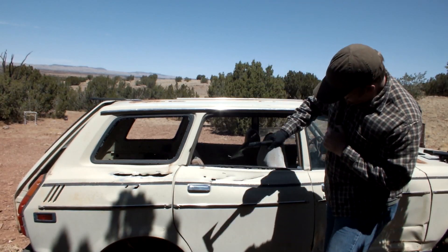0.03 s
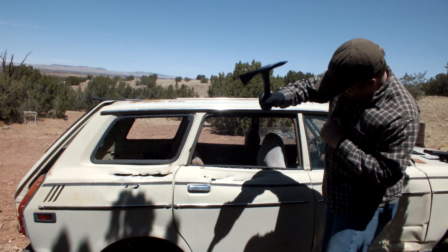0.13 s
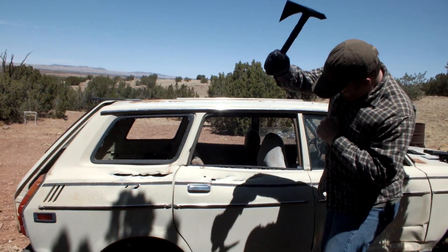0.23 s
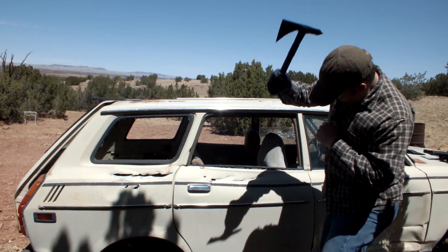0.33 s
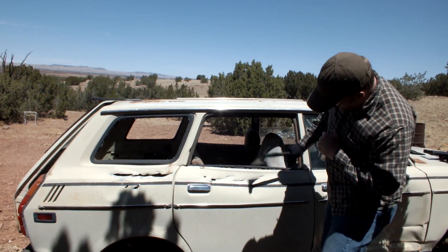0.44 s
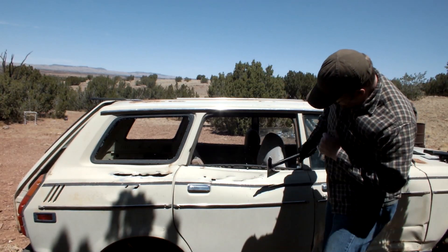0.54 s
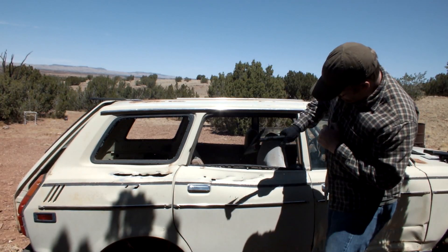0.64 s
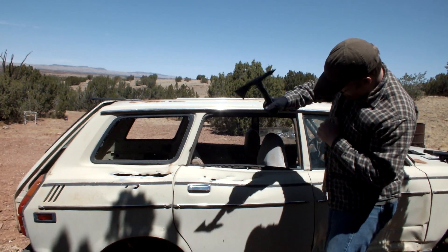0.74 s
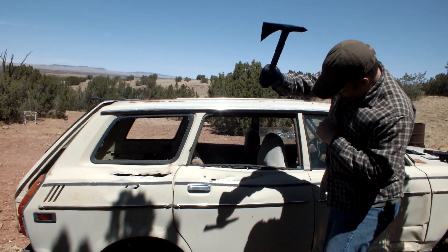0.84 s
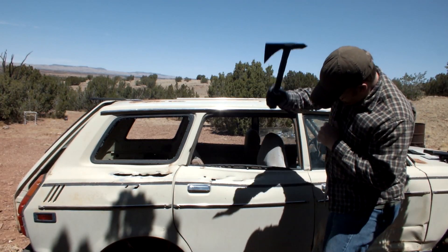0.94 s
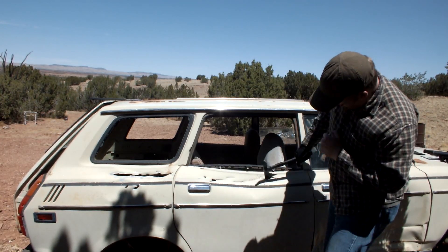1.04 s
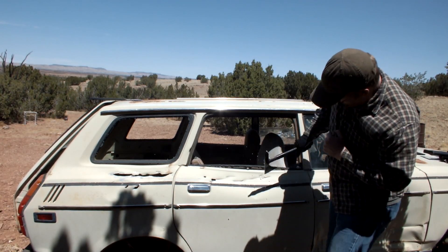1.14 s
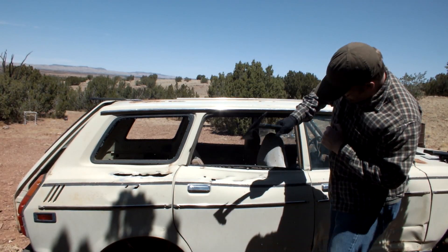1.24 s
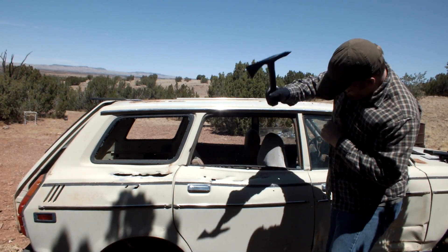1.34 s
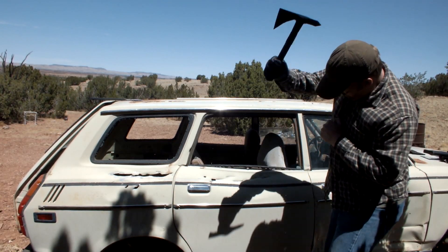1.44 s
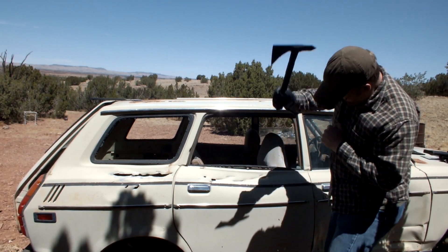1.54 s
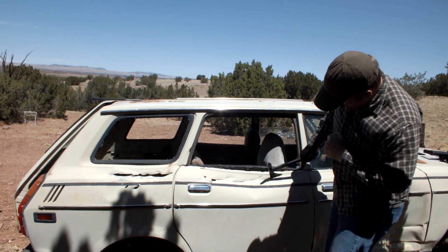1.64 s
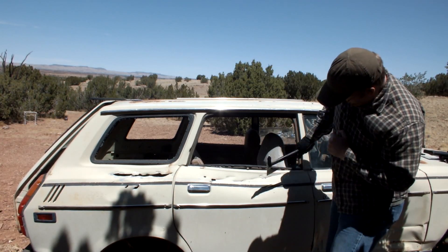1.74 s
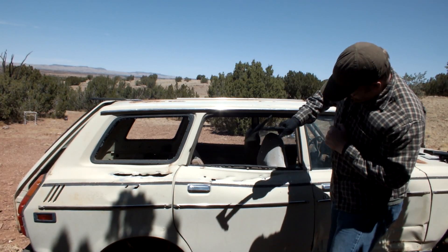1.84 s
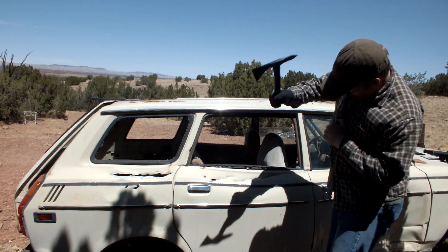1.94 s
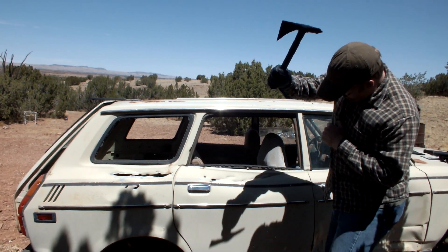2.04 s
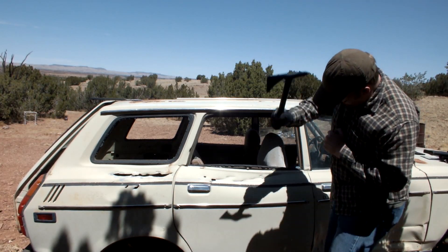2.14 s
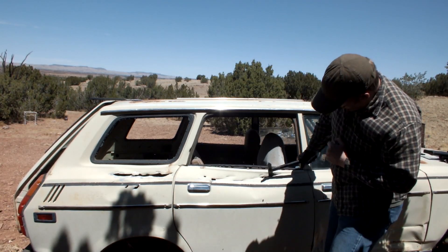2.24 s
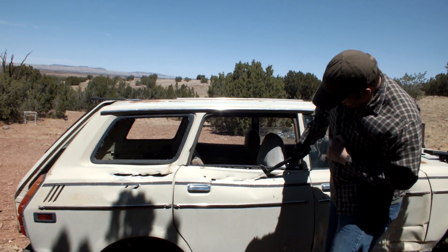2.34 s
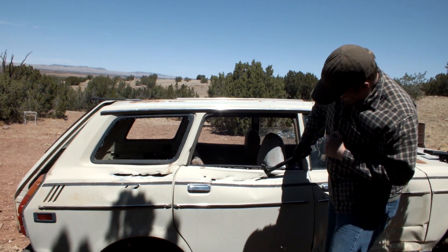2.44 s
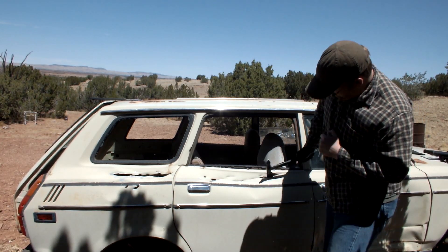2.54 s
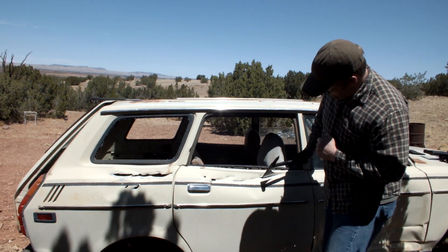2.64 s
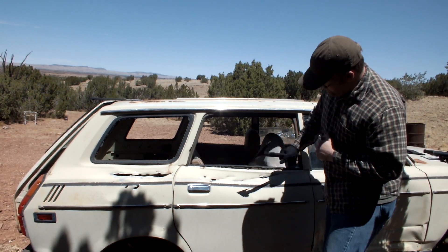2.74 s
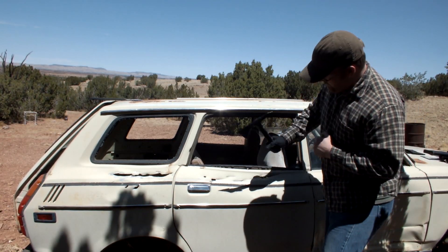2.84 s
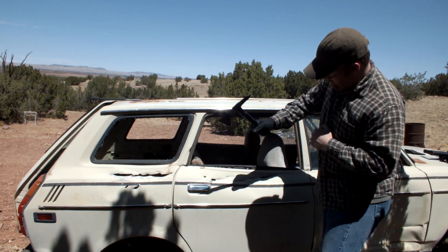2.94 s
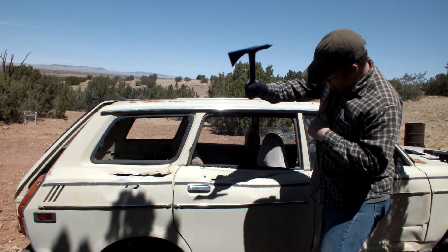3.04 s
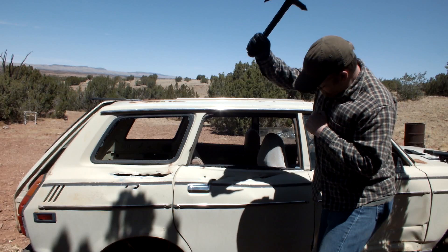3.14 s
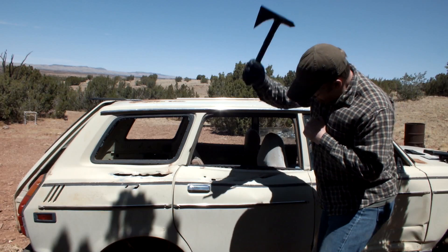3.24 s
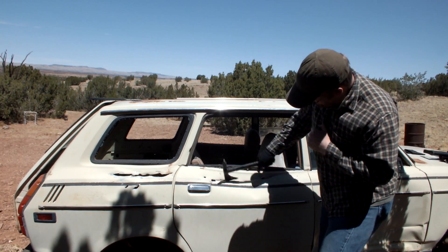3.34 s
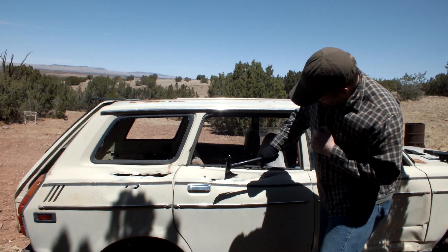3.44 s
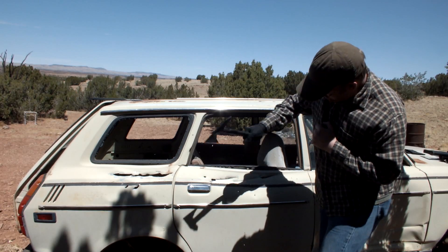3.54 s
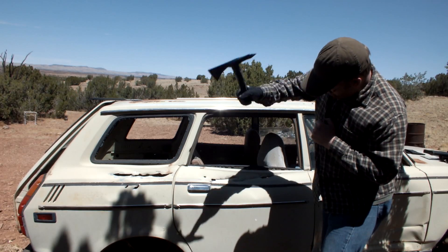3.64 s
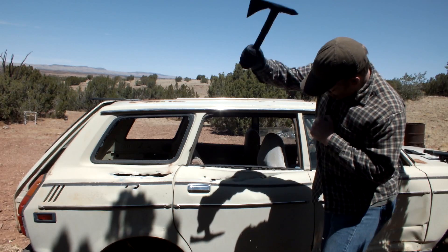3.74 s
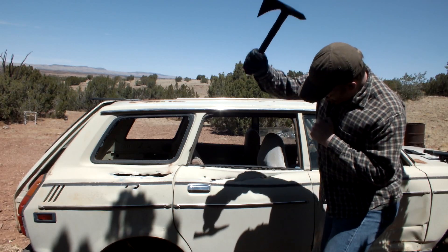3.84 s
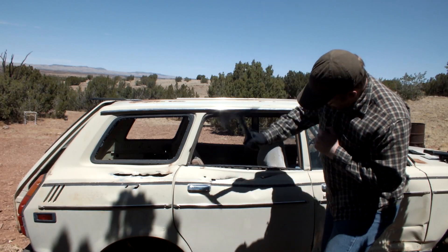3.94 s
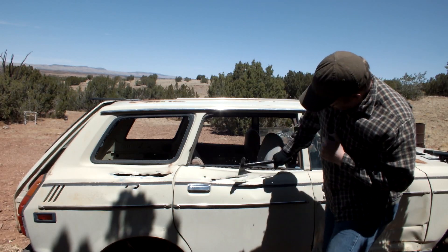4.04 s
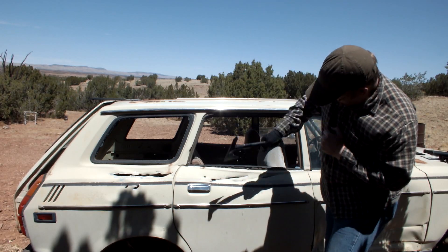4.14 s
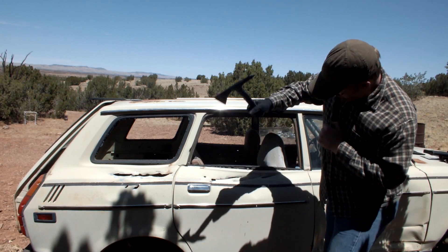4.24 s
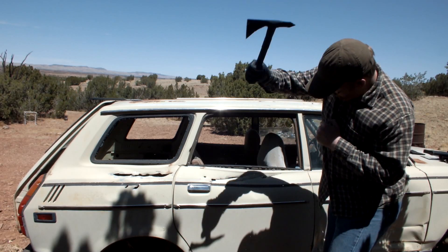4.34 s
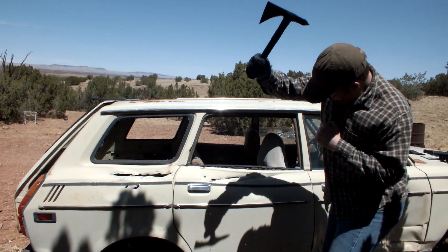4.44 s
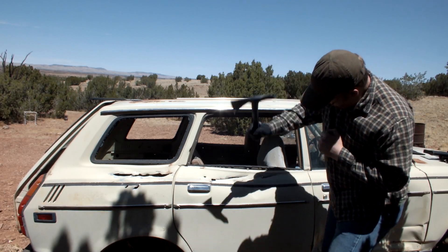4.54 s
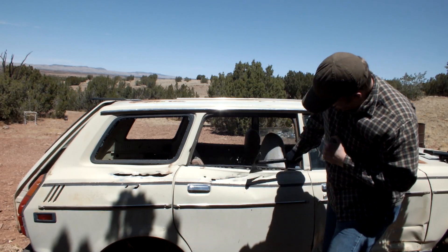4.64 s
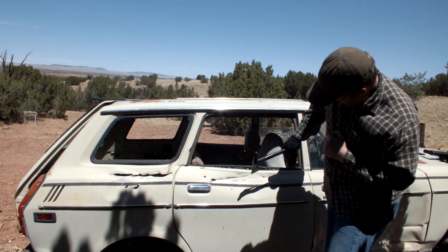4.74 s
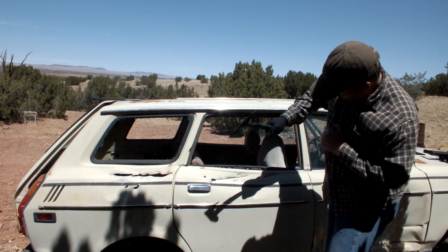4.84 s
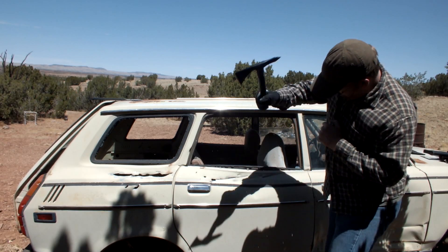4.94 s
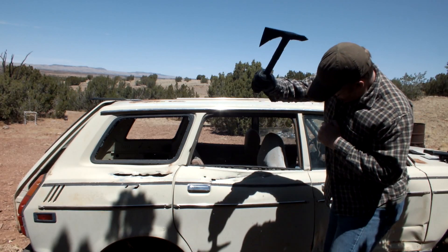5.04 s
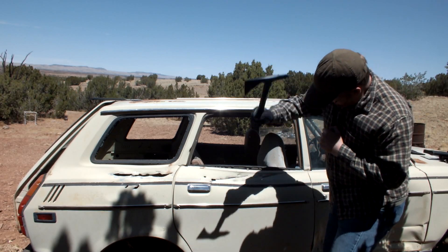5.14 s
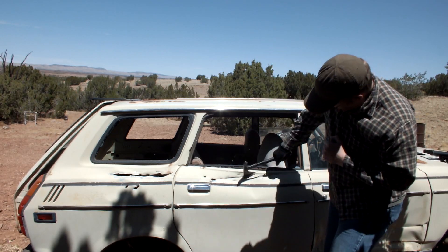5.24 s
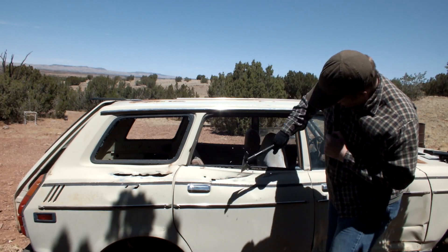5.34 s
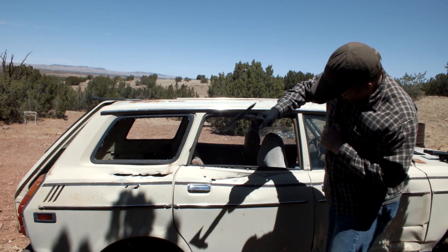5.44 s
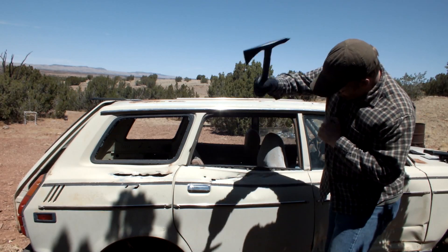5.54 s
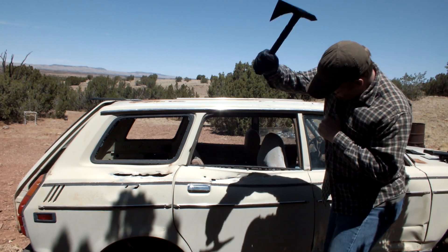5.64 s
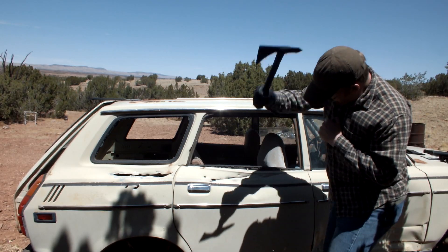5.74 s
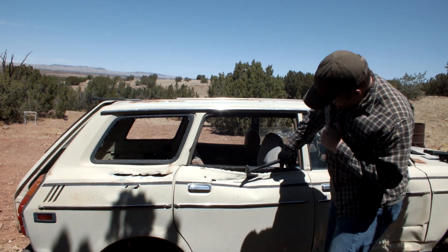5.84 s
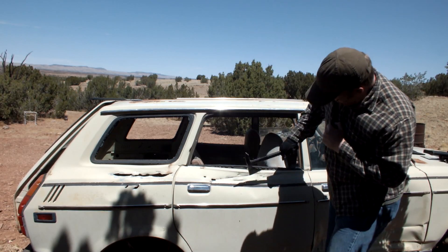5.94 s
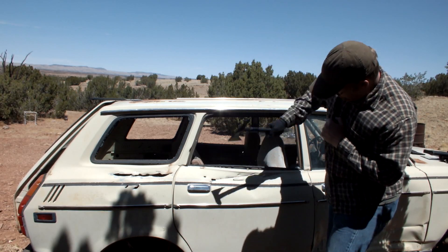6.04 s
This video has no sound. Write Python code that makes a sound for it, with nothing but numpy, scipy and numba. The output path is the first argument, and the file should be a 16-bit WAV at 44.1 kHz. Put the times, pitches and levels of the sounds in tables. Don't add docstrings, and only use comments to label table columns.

```python
import sys
import numpy as np
from scipy import signal
from scipy.fft import rfft, irfft
from scipy.io import wavfile
from scipy.ndimage import uniform_filter1d
from numba import njit

SR = 44100
rng = np.random.default_rng(int(sys.argv[2]) if len(sys.argv) > 2 else 0)


def dump(signal):
    limited = np.clip(np.atleast_2d(signal).T, -1, 1)
    pcm = np.round(limited * 32767).astype(np.int16)
    wavfile.write(sys.argv[1], SR, pcm)


def makeup_ratio(level_db):
    decades = np.asarray(level_db, float) / 20
    return 10 ** decades


N = 268127
FREQ = np.maximum(np.fft.rfftfreq(N, 1 / SR), 1)


def read(table, hz):
    f, v = np.transpose(table)
    return np.interp(np.log(hz), np.log(f), v)


# hz, share
APART = [(60, .02), (500, .07), (1000, .17), (2000, .26), (4000, .42), (8000, .74), (16000, .72)]


def pair_noise():
    mid, side = rfft(rng.standard_normal((2, N)))
    share = read(APART, FREQ)
    return np.sqrt(1 - share ** 2) * mid + share * side * np.array([[1], [-1]])


def coloured(table):
    x = irfft(pair_noise() * makeup_ratio(read(table, FREQ)), N)
    return x / x.std()


def wander(hold, smooth):
    steps = np.repeat(rng.standard_normal(N // hold + 1), hold)[:N]
    return uniform_filter1d(steps, size=smooth)


def band(x, order, low_hz, high_hz):
    return signal.lfilter(*signal.butter(order, [low_hz, high_hz], "band", fs=SR), x)


def steep(x, order, hz, kind="low"):
    return signal.sosfilt(signal.butter(order, hz, kind, fs=SR, output="sos"), x)


def fading(times_s, sizes, hz, t60_s):
    pole = np.exp((2j * np.pi * hz - np.log(1000) / max(t60_s, 0.005)) / SR)
    at = np.round(times_s * SR).astype(int)
    kicks = np.zeros(N, complex)
    np.add.at(kicks, np.maximum(at, 0), sizes * pole ** np.maximum(-at, 0))
    return signal.lfilter([1], [1, -pole], kicks)


def swelling(times_s, sizes, hz, t60_s, swell_s):
    rise = fading(times_s, sizes, hz, min(swell_s, t60_s / 2))
    return fading(times_s, sizes, hz, t60_s) - rise


def shaken(s, sizes_db, t60s_s):
    delay_s, rise_s = 0.0042, 0.36
    t, out = np.arange(N) / SR, np.zeros(N)
    for at, until, db, t60_s in zip(s, np.append(s[1:], N), sizes_db, t60s_s):
        age = np.maximum(t - at - delay_s, 0)
        out += makeup_ratio(db - 60 * age / t60_s) * np.minimum(age / rise_s, 1) * (t < until)
    return out


# hz, db_per_hz
AIR = [(15, -49), (25, -6), (114, 3), (378, 7), (483, 3.5), (1430, 0), (2040, 1), (2210, -4), (3150, -2),
       (12900, -17.5), (16500, -70)]
# hz, db_per_hz
WIND = [(25, -24), (65, -6.5), (100, -17), (130, 1), (170, -22), (300, -54.5)]


def outdoors():
    return makeup_ratio(-53) * coloured(AIR) + makeup_ratio(-58.5) * coloured(WIND)


# hz, db_per_hz
CRUMBS = [(290, -11.5), (500, -4.5), (570, -10.5), (742, -5.5), (2730, -10.5), (2980, -11.5),
          (13400, -32.5), (16500, -28)]
# hz, db_per_hz
CREAK = [(60, 15), (130, 20), (200, -4), (350, 11), (700, 7.5), (1400, -60)]


def trickle(s, crumb_db, crumb_t60_s, creak_db):
    still_db, creak_t60_s = -67.5, 1.48
    when, luck = rng.random((2400, 2)).T
    grains = fading(when * N / SR, makeup_ratio(-2.6 * np.log(1 - luck)), 0, 0.012).real
    x = coloured(CRUMBS) * (grains + 2.6)
    crumbs = shaken(s, crumb_db, crumb_t60_s) + makeup_ratio(still_db)
    creak = shaken(s, creak_db + 2, np.full(len(s), creak_t60_s))
    return x / x.std() * crumbs + coloured(CREAK) * creak


# start_s, peak_db, centre_hz
TICKS = [(0.009, -7, 2090), (0.115, -39, 8000), (0.137, -42, 8000), (0.228, -33, 1000), (0.239, -30, 4200),
         (0.258, -29, 8000), (0.427, -45, 1000), (0.619, -24, 4200), (0.682, -39, 8000), (0.723, -17, 984),
         (1.502, -48, 9000), (1.039, -38, 2080), (1.071, -16, 6100), (1.278, -19, 2100), (1.374, -32, 2100),
         (1.536, -15.5, 4230), (1.813, -32, 4200), (1.867, -48, 8000), (1.884, -15.5, 8000),
         (1.942, -15, 4150), (1.983, -45, 8000), (2.055, -42, 8000), (2.13, -21, 990), (2.192, -35, 8000),
         (2.221, -40, 8000), (2.55, -32, 1000), (2.582, -24, 4170), (2.657, -30, 1000), (3.5, -17, 4200),
         (3.519, -26, 8040), (3.55, -27, 8000), (3.612, -25, 3500), (3.698, -19, 4200), (3.74, -22, 8000),
         (3.765, -30, 8000), (3.949, -28, 1000), (3.991, -37, 8000), (4.01, -31, 8000), (4.082, -11, 4200),
         (4.117, -26, 4200), (4.157, -21, 8040), (4.215, -36, 8000), (4.233, -20, 1000), (4.262, -20, 2090),
         (4.359, -36, 1000), (4.434, -31, 7900), (4.474, -35, 8000), (4.488, -29, 1010), (4.545, -28, 4200),
         (4.583, -33, 2100), (4.62, -27, 1000), (1.359, -39, 6500), (4.783, -30, 8000), (4.865, -45, 4200),
         (4.881, -36, 2100), (4.916, -24, 2100), (5.108, -37, 8000), (5.812, -32, 4200), (5.992, -21, 2100),
         (6.054, -18, 1000)]


def ticks(press):
    t60_s, rise_s, spread = 0.043, 0.0014, 1.28
    out, t = np.zeros((2, N + SR)), np.arange(SR // 10) / SR
    shape = np.exp(-np.log(1000) * t / t60_s) * np.minimum(t / rise_s, 1)
    for s, db, hz in TICKS:
        chance = rng.standard_normal((3, len(t)))
        noise = chance[0] + min(hz / 8000, 1) * chance[1:]
        burst = band(noise, 2, hz / spread, min(hz * spread, 15000))
        tones_hz = hz * np.exp(0.23 * chance[0, :3, None])
        rings = np.sin(2 * np.pi * tones_hz * t).sum(axis=0)
        start = int(s * SR)
        out[:, start:start + len(t)] += makeup_ratio(db - 6) * (burst / burst.std() + 0.46 * rings) * shape
    return out[:, :N] * press


# start_s, peak_db, t60_s
SLAPS = [(0.0493, -10.5, 0.057), (0.5335, 26, 0.061), (0.6645, -10, 0.045), (1.2797, -29, 0.25),
         (1.3588, -32, 0.22), (2.4312, -16, 0.058), (2.467, -24.5, 0.061), (3.4104, -21, .1),
         (3.599, -22, 0.33), (4.172, -6.5, 0.08), (4.2335, -26, 0.16), (4.2647, -24.5, 0.23),
         (4.758, -5.5, 0.14), (4.896, -34, 0.47), (5.3737, -8, 0.16), (5.4174, -7.5, 0.075),
         (5.4777, -21, 0.11), (5.926, 18, 0.053)]
# start_s, peak_db, centre_hz, treble_db, rise_ms
SCRAPES = [(0.3121, -21, 1293, -0.5, 5.1), (0.7145, -12, 3185, -50, 2), (0.797, -23, 1473, -14, 3),
           (0.963, -4.5, 1586, -12, 2.7), (1.073, -13, 1364, -16, 1.1), (1.432, -31.5, 2250, -21, 1),
           (1.529, -18.5, 1590, -15, 3.3), (1.5388, -14.5, 1346, -22, 3.2), (1.552, -18.5, 1540, -20, 1.8),
           (1.5894, -18, 3080, -8, 3), (1.6099, -11, 1860, -25, 3.7), (1.671, -21.5, 1330, -14, 2.2),
           (2.2348, -9, 1530, -13, 2), (2.7406, -13.5, 2430, -1, 6.5), (2.8577, -35, 1170, -12, 3),
           (3.831, -13, 2990, -5, 4.5), (4.9175, -26, 6220, -20, 1.3), (4.943, -13, 2270, -11, 2.7),
           (4.953, -15, 2520, -12, 3.5), (4.966, -20, 2060, -25, 2.8), (5.1546, -10, 1830, -13.5, 2.25)]
# start_s, peak_db, centre_hz, t60_s
SHARDS = [(0.2888, -33, 3620, 0.12), (0.3972, -34, 2390, 0.094), (0.45, -38, 1410, 0.08),
          (0.829, -15, 2385, 0.085), (0.884, -40.5, 2050, 0.15), (1.8845, -18, 1470, 0.12),
          (2.0819, -17.5, 3850, 0.064), (2.1655, -27.5, 4400, 0.046), (2.539, -42, 6600, 0.37),
          (2.6571, -29.5, 4180, 0.055), (2.697, -33, 6800, 0.26), (2.717, -18.5, 3560, 0.078),
          (2.966, -24, 2930, 0.082), (3.698, -26, 1687, 0.47), (3.7207, -15, 2155, 0.091),
          (3.7813, -15, 3180, 0.16), (3.867, -26.5, 3870, 0.37), (3.894, -21.5, 2500, 0.13),
          (3.922, -22, 3130, 0.081), (4.0107, -29, 3250, 0.082), (4.304, -25, 2810, 0.13),
          (4.359, -28, 5050, 0.073), (4.416, -29, 4550, 0.18), (4.4498, -29, 3100, 0.52),
          (4.5176, -29.5, 2050, 0.12), (4.621, -22, 2880, 0.095), (5.5588, -39, 1530, .049),
          (5.6543, -32, 2070, 0.094), (5.81, -41, 1405, 0.25)]
# start_s, peak_db, centre_hz, t60_s
CHIPS = [(0.2582, -23.5, 1370, 0.066), (0.9434, -59, 1630, 0.032), (1.0107, -29.5, 2700, 0.044),
         (1.0395, -30, 2000, 0.037), (1.6361, -15.5, 1890, 0.088), (1.943, -21, 1540, 0.06),
         (1.9857, -30.5, 2030, 0.11), (2.0238, -28.5, 3570, 0.1), (2.046, -28.5, 4060, 0.16),
         (2.123, -19, 3770, 0.068), (2.1805, -25, 4200, 0.1), (2.82, -38, 3970, 0.11),
         (3.016, -28.5, 2850, 0.089), (3.0613, -47, 1530, .057), (3.117, -45, 1910, .053),
         (3.289, -38.5, 2340, 0.084), (3.6528, -21.5, 2810, 0.24), (3.95, -28.5, 3950, 0.16),
         (4.4887, -17, 4180, 0.075), (4.6072, -32.5, 2900, 0.14), (5.078, -36, 2720, 0.13),
         (5.13, -30, 2050, 0.18), (5.183, -27, 1470, 0.056), (5.698, -27.5, 1575, 0.11),
         (5.716, -41, 2300, 0.073), (5.889, -32, 2000, 0.085), (.503, -52, 2510, 0.055),
         (5.277, -52, 2480, 0.05), (3.19, -46, 2200, 0.55), (1.206, -16, 2050, 0.095)]
# start_s, peak_db, centre_hz, t60_s, rise_ms
KNOCKS = [(0.959, -23.5, 480, 0.35, 11), (6.4, -26, 660, 0.11, 3.2), (3.15, -56, 400, .4, 9.8),
          (2.586, -12, 450, 0.078, 1.65), (2.598, -17, 690, 0.14, 2.3), (3.086, -54, 250, 0.091, 3),
          (4.947, -8.5, 1100, 0.16, 2.4), (4.9, -25, 380, 0.25, 2.7), (3.896, -31, 350, 0.086, 2.3),
          (4.49, -27.5, 390, 0.12, 3.9), (.72, -15, 600, 0.14, 2.8)]


def pieces():
    return ([(s, db, 1330, t60_s, -22, 1.84) for s, db, t60_s in SLAPS]
            + [(s, db, hz, 0.079, treble_db, rise_ms) for s, db, hz, treble_db, rise_ms in SCRAPES]
            + [(s, db, hz, t60_s, -5, 1) for s, db, hz, t60_s in SHARDS]
            + [(s, db, hz, t60_s, -14, 1) for s, db, hz, t60_s in CHIPS]
            + [(s, db, hz, t60_s, -20, rise_ms) for s, db, hz, t60_s, rise_ms in KNOCKS])


def piece(t, db, hz, t60_s, treble_db, rise_ms):
    chance = rng.standard_normal((4, len(t)))
    fall = np.log(1000) * t / min(t60_s, 0.4)
    body = band(chance[0] + 0.24 * chance[1:3], 1, hz / 2.94, min(hz * 3.53, 16000))
    body = band(body, 2, hz / 3.77, max(hz * 1.38, 4600))
    tones_hz = hz * np.exp(0.26 * chance[3, :8, None])
    rings = np.sin(2 * np.pi * tones_hz * t).sum(axis=0) * np.exp(-0.25 * fall)
    spit = band(chance[3] + 23 * chance[1:3], 2, 4500, 13000)
    glints_hz = 6800 * np.exp(0.25 * chance[3, 8:12, None])
    glints = np.sin(2 * np.pi * glints_hz * t).sum(axis=0)
    treble = makeup_ratio(treble_db + 1.5) * (spit / spit.std() + 0.14 * glints) * np.exp(-0.3 * fall)
    sound = (body / body.std() + 0.36 * rings + treble) * np.exp(-fall)
    grit = makeup_ratio(2.2 * np.repeat(chance[0, :len(t) // 64 + 1], 64)[:len(t)])
    touch = 1.9 * np.exp(-t / 0.0022) / rise_ms
    rise = 1 - np.exp(-t * 1000 / rise_ms)
    return makeup_ratio(db - 7) * (rise * grit + touch) * sound


# start_s, pitch_hz, level_db, t60_s
RINGS = [(0.238, 6900, -40, 0.08), (0.272, 14800, -40, .04), (.716, 3300, -17, 0.044),
         (.8, 1450, -34, 0.089), (.965, 396, -29, 0.22), (1.432, 2330, -29, 0.06), (1.433, 2050, -31, .05),
         (2.537, 6900, -39, .15), (2.537, 11300, -48, .12), (2.582, 409, -17, .14), (2.585, 432, -22, .12),
         (2.59, 240, -25, .1), (1.433, 2180, -30, .05), (1.433, 2600, -33, .05), (2.747, 2700, -31, .08),
         (2.747, 2150, -32, .1), (2.598, 7590, -47, .2), (.523, 7600, 4, .012), (3.994, 6200, -40, .04),
         (2.622, 14800, -42, .04), (2.695, 6800, -40, .1), (2.695, 11300, -48, .1),
         (2.747, 2920, -32, 0.16), (2.747, 2945, -37, .14), (2.745, 1480, -32, .09), (2.6, 1600, -31, .07),
         (2.747, 2470, -26, 0.093), (2.747, 1700, -32, .12), (2.745, 3570, -30, 0.092),
         (2.745, 4480, -35, .1), (3.19, 2080, -57, .9), (3.426, 3650, 8, 0.023), (3.61, 6960, -36, 0.06),
         (1.302, 6000, -40, .05), (1.281, 2300, -27, .04), (4.304, 3050, -24, .07), (4.272, 2700, -30, .09),
         (3.657, 3000, -25, .07), (4.152, 2000, -14, .05), (4.236, 800, -24, .08), (1.886, 6100, -24, .04),
         (4.362, 4600, -32, .07), (3.835, 5440, -27, 0.055), (5.42, 765, -5, 0.035), (5.56, 7590, -56, .3),
         (5.562, 6050, -44, .025), (5.812, 6500, -44, .03), (5.93, 7578, -13, .27), (5.93, 7601, -17, .27),
         (5.93, 6400, -12, .1), (.55, 7590, -24, .3)]


def chips():
    out, t = np.zeros((2, N + SR)), np.arange(SR // 5) / SR
    for s, *settings in pieces():
        start = int(s * SR)
        out[:, start:start + len(t)] += piece(t, *settings)
    pings = sum(fading(np.array([s]), makeup_ratio(db), hz, t60_s).imag for s, hz, db, t60_s in RINGS)
    out = out[:, :N] + pings
    shaded = band(out, 1, 1300, 6000)
    return out + shaded * (makeup_ratio(np.array([[-2.25], [2.25]])) - 1)


# start_s, pitch_hz, level_db (against the door ring)
DENTS = [(0.0, 243.5, 3), (0.0, 181.5, -1), (0.512, 416, -14), (0.512, 180, 0.5), (0.512, 594, -4.5),
         (0.539, 290, -10), (0.574, 408, -2.5), (0.594, 274, 1), (1.096, 414, 3), (1.137, 247, -8),
         (1.14, 410, 3.5), (1.175, 334, 1), (1.192, 230, -1.5), (1.198, 167, -6), (1.698, 291, -13),
         (1.706, 455, -1), (1.726, 382, -2), (2.276, 905, -10), (2.276, 760, 1), (2.276, 520, -4),
         (2.324, 400, -1), (2.338, 234, -8), (2.35, 166, -3), (2.408, 245, -1), (3.402, 385, -5),
         (3.402, 754, -5), (3.517, 166, -2.5), (4.042, 371, -9), (4.042, 554, -3), (4.068, 490, -13),
         (4.077, 370, -4), (4.109, 291, -1), (4.656, 606, -13), (4.656, 395, -11), (4.656, 262, -1),
         (4.689, 387, -3), (4.721, 278, -7), (4.75, 333, -1), (5.285, 293, -1), (5.285, 384, -7),
         (5.319, 544, -6), (5.366, 311, -5), (5.902, 329, -2), (5.902, 257, 4), (5.902, 450, -13),
         (5.902, 554, -2.5), (5.964, 397, -2)]


def dents(ring):
    swell_s, lag_s, sag = 0.064, 0.002, 0.025
    out, t = np.zeros(N + SR), np.arange(int(swell_s * SR)) / SR
    shape = np.sin(np.pi * np.sqrt(t / swell_s)) ** 2
    cycles = t * (1 + sag * (0.5 - t / swell_s / 2))
    for (s, hz, db), turn in zip(DENTS, 2 * np.pi * rng.random(len(DENTS))):
        start = int((s + lag_s) * SR)
        out[start:start + len(t)] += makeup_ratio(db) * shape * np.sin(2 * np.pi * hz * cycles + turn)
    return out[:N] * ring


HEAD_HZ = [7570, 7605, 6400, 11300]
# level_db, t60_s
HEAD = [(-23, 0.42), (-39, 0.4), (-47, .15), (-78, .2)]


def axe_head(s, head_db):
    grip_db = 3 * wander(512, 256)
    modes = sum(fading(s, makeup_ratio(db + head_db), hz, t60_s).imag for hz, (db, t60_s) in zip(HEAD_HZ, HEAD))
    return makeup_ratio(grip_db) * modes


# hz, level_db, t60_s
BODY = [(66.25, -15, 0.63), (77.25, -22.5, 0.5), (166.5, -9.5, 0.47), (230, -21.5, 0.6), (266, -11, 0.47),
        (317.4, -7.5, 0.4), (384.4, -8, 0.32), (422, -5.5, 0.3), (547, -36, 0.17), (769, -13, 0.3),
        (942, -18, 0.42)]


def hollow_body(s, ring_db, boom_db):
    out = np.zeros(N)
    for hz, db, t60_s in BODY:
        boomy = hz < 140
        chance = rng.standard_normal((len(s), 3))
        for at, size_db, (spot, turn, dent) in zip(s, ring_db + boom_db * boomy, chance):
            start = max(int(at * SR), 0)
            t = np.arange(start, min(start + SR * 2 // 3, N)) / SR - at
            rise = (1 - np.exp(-t * hz / 0.68)) * (1 - boomy * np.exp(-t / 0.024))
            fade = np.exp(-np.log(1000) * t / t60_s) * rise
            tone = np.sin(2 * np.pi * hz * (1 + 0.02126 * dent) * t + turn)
            out[start:start + len(t)] += makeup_ratio(db + size_db + 3.64 * spot) * fade * tone
    return out


# hz, db_per_hz
SKIN = [(24, -53), (40, -4.5), (70, -3), (134, -6.5), (271, 3.5), (560, 2), (933, -5.5), (1170, -8.5),
        (1400, -7), (4500, -22.5), (6000, -28.5), (13500, -43), (14900, -47), (16500, -99)]
# hz, t60_s
SKIN_T60 = [(50, 0.42), (130, 0.42), (400, 0.3), (1000, 0.26), (2500, 0.25), (6000, 0.26), (15000, 0.21)]


def door_skin(s, ring_db, boom_db, bright_db):
    noise, crowd = pair_noise() * makeup_ratio(read(SKIN, FREQ)), 0
    slaps = wander(384, 128)
    for hz in 53 * 2 ** np.arange(0, 8.6, 0.5):
        bell = np.cos(np.pi * np.clip(np.log2(FREQ / hz), -0.5, 0.5)) ** 2
        rattle_db = (1.9 * wander(128, 128) + 2.2 * slaps) * min(hz / 550, 1)
        tilt_db = bright_db * np.log2(max(hz / 600, 1)) / 2 + boom_db * (hz < 140)
        tilt_db = tilt_db + 0.94 * rng.standard_normal(len(s))
        fade = swelling(s, makeup_ratio(ring_db + tilt_db), 0, read(SKIN_T60, hz), 26 / hz).real
        crowd = crowd + irfft(noise * bell, N) * fade * makeup_ratio(rattle_db)
    return makeup_ratio(18.5) * crowd


# start_s, loss_db
TUGS = [
    (0.071, 7),
    (0.677, 13),
    (1.234, 9),
    (1.86, -1),
    (2.445, 12.5),
    (3.62, -0.5),
    (4.191, 10.5),
    (4.802, 10.5),
    (5.431, 7.5),
    (6.052, 7.5),
]


def muffle(s):
    t, db = np.arange(N) / SR, np.zeros(N)
    for (at, loss_db), until in zip(TUGS, np.append(s[1:], N)):
        db -= loss_db * np.clip((t - at + 0.0086) / 0.017, 0, 1) * (t < until)
    return makeup_ratio(db)


# dent_hz, dent_db, edge_hz, edge_db
PUNCH = [
    (1200, 17, 3700, 16),
    (610, 16, 3800, 25),
    (670, 23, 2700, 20),
    (1150, 21, 3470, 15.5),
    (770, 28, 2400, 28),
    (750, 12, 2740, 23.5),
    (560, 31, 3070, 25.5),
    (610, 27.5, 2520, 21),
    (1530, 16, 2540, 21.5),
    (1420, 20, 2620, 25),
]
# hz, db_per_hz
CRACK = [(180, -13.5), (300, -4.5), (2480, -11.5), (5370, -16), (8300, -19), (9490, -66), (13500, -51),
         (15700, -30), (16500, -59)]


def crack(s, crack_db):
    punch = np.zeros(N)
    for at, (dent_hz, dent_db, edge_hz, edge_db) in zip(s[1:], PUNCH[1:]):
        punch += swelling(np.array([at + 0.001]), makeup_ratio(dent_db), dent_hz, 0.011, 0.005).imag
        punch += swelling(np.array([at]), makeup_ratio(edge_db), edge_hz, 0.008, 0.005).imag
    noise = coloured(CRACK) * swelling(s, makeup_ratio(crack_db + 9.5), 0, 0.075, 0.0052).real
    spit_db = np.array(PUNCH)[1:, 3] + 2.5
    spit = coloured(CRUMBS) * swelling(s[1:], makeup_ratio(spit_db), 0, 0.008, 0.005).real
    return punch + noise + spit


# start_s, crack_db, ring_db, boom_db, head_db
BLOWS = [
    (-0.099, 0, 4.5, 3.5, -22),
    (0.5124, 1, 10.5, 6.5, -22),
    (1.0963, 3, 6.5, 9, -29),
    (1.698, -1.5, -5, 12, -31),
    (2.2758, 11, 7, 16, -29),
    (3.402, 8, -2.5, 4.5, -26),
    (4.042, 7.5, 7, 5, -24),
    (4.6565, 0, 6.5, 5, -33),
    (5.2846, 7.5, 3.5, 7.5, -11),
    (5.902, -6, 3.5, 5.5, -20),
]
# crumbs_db, crumbs_t60_s, creak_db, ring_brightness_db
LOOSE = [
    (-16.5, 0.7, -38, 5),
    (-22.5, 0.83, -41, 3),
    (-16.5, 0.47, -36.5, 3),
    (-38, 3.3, -55, 3),
    (-20.5, 0.82, -56, 3.5),
    (-16, 1.2, -42, 7),
    (-32, 1.93, -44, 5),
    (-41, 3.4, -35.5, 5),
    (-36, 2.2, -35, 4.5),
    (-2.5, 0.4, -36, 5.5),
]
PLATEAU_DB, SQUEEZE = -13.5, 0.9


def scene():
    s, crack_db, ring_db, boom_db, head_db = np.transpose(BLOWS)
    crumb_db, crumb_t60_s, creak_db, bright_db = np.transpose(LOOSE)
    s, ring_db, boom_db = s + 0.00064, ring_db + 3, boom_db - 6.5
    door_s = s + 0.00062
    door = hollow_body(door_s, ring_db, boom_db) + door_skin(door_s, ring_db, boom_db, bright_db)
    door = muffle(s) * door
    blows = door + crack(s, crack_db) + axe_head(s, ring_db + head_db)
    faint = trickle(s, crumb_db, crumb_t60_s, creak_db) + outdoors()
    small = steep(chips(), 4, 225, "high")
    ring = 1.25 * uniform_filter1d(np.abs(door[0]), size=1500)
    press = np.maximum(ring / makeup_ratio(PLATEAU_DB), 1) ** SQUEEZE
    blows = blows + dents(ring)
    small = small + ticks(press)
    return blows + steep(small, 8, 15000) + steep(faint, 8, 14000)


@njit
def follower(x, attack, release):
    e, out = 1., np.empty(len(x))
    for i in range(len(x)):
        e += (x[i] - e) * (attack if x[i] > e else release)
        out[i] = e
    return out


def crossover(x, kind):
    return steep(steep(x, 2, 130, kind), 2, 130, kind)


def low_pass(x):
    return signal.sosfilt(signal.butter(12, 16820, fs=SR, output="sos"), x)


def record(dry):
    attack_s, release_s = 0.0021, 0.015
    level = follower(np.abs(dry).max(axis=0), 1 / (attack_s * SR), 1 / (release_s * SR))
    squeeze = np.minimum(makeup_ratio(PLATEAU_DB) / level, 1) ** SQUEEZE
    gain = 0.67 * squeeze * makeup_ratio(np.array([[-1.5], [1.5]]))
    x = gain * crossover(dry, "low") + crossover(np.tanh(gain * dry), "high")
    dip_hz, dip_width_hz = 5150, 910
    x = x - 0.35 * signal.lfilter(*signal.iirpeak(dip_hz, dip_hz / dip_width_hz, fs=SR), x)
    x = steep(x, 2, 35, "high")
    x = steep(np.clip(x, -0.84, 0.84), 8, 15000)
    return low_pass(x)


dry = scene()
out = record(dry)
dump(out)
```